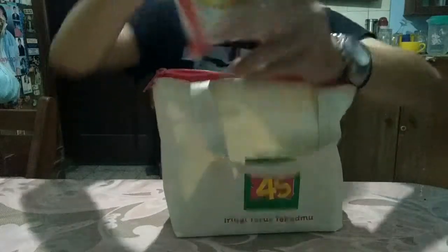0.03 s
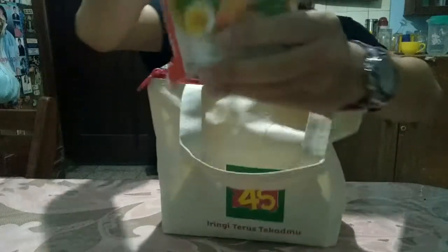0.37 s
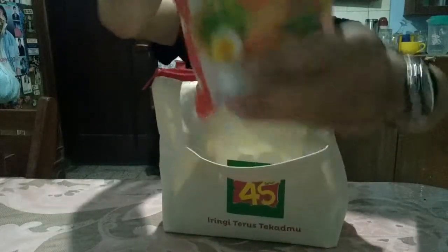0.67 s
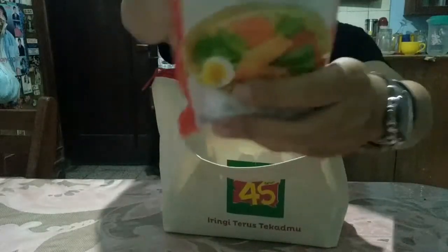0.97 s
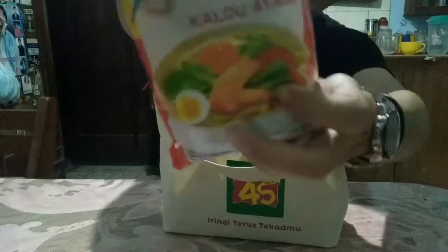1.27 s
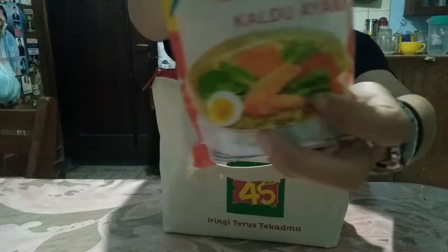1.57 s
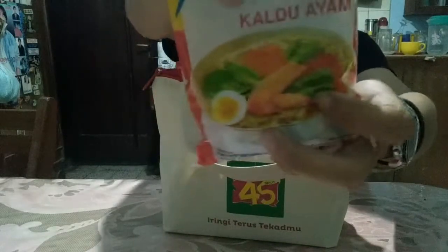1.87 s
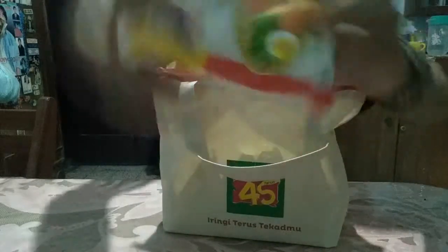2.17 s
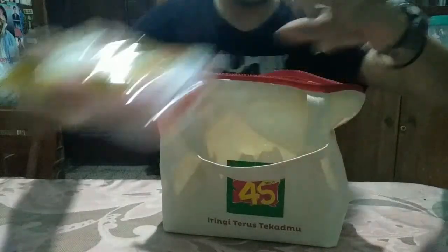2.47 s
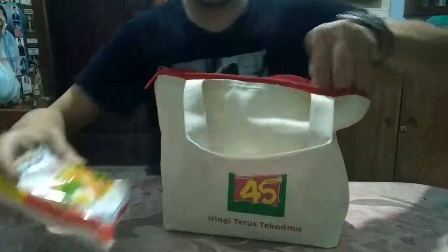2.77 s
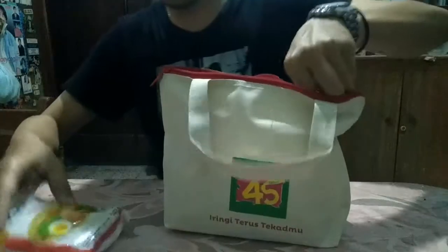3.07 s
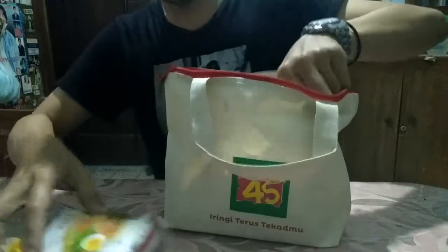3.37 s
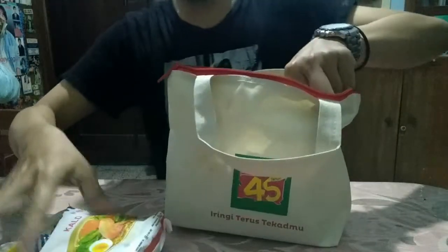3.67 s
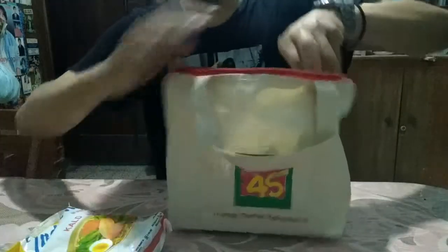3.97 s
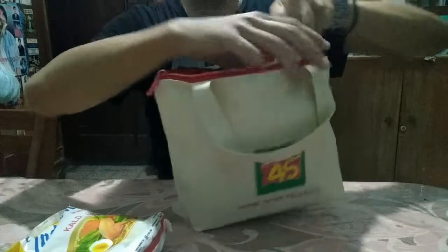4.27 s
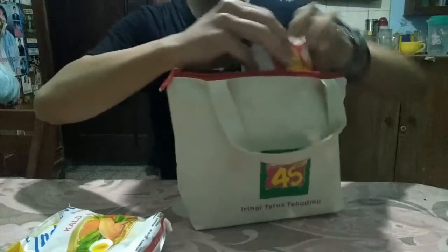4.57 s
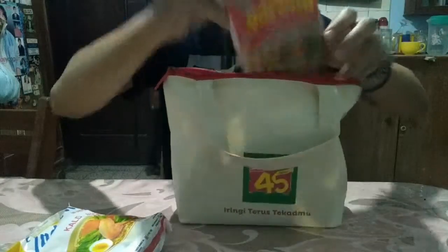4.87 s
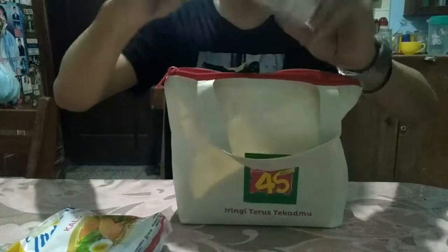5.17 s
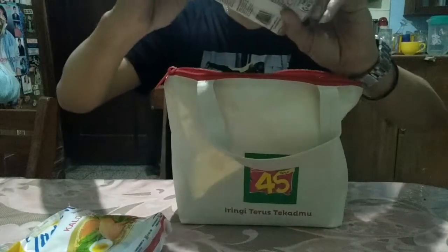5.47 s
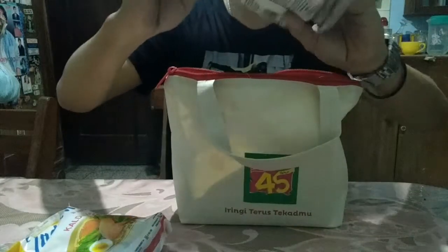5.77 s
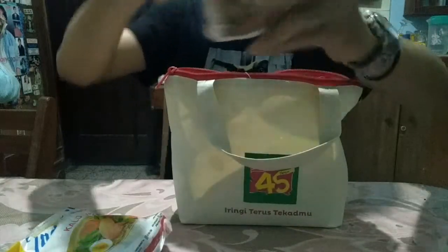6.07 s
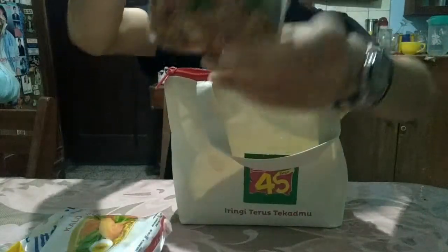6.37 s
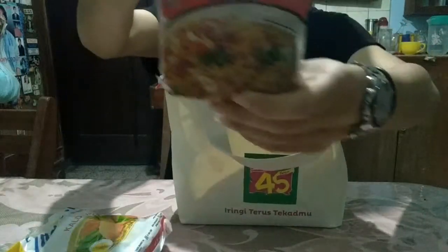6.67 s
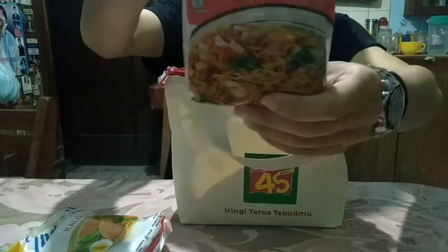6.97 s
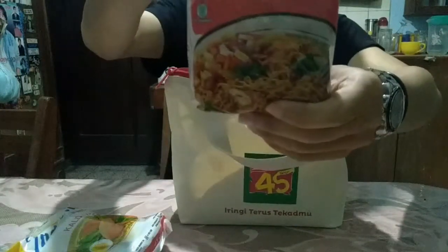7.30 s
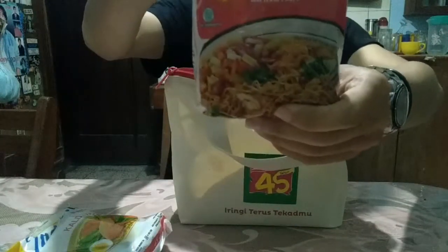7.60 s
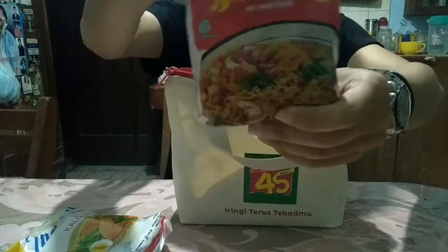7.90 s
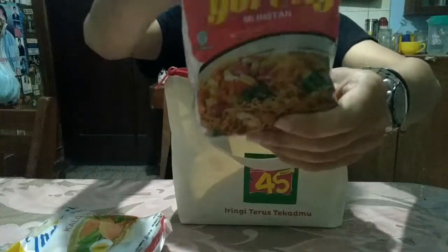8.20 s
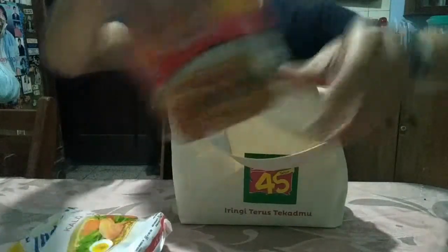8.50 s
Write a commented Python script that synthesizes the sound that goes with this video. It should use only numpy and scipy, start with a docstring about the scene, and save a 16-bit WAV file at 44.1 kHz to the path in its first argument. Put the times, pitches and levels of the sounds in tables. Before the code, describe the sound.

Plastic noodle packets crinkle and snap up close as they are pulled from a cloth bag, and one thumps onto a table.

```python
"""Plastic noodle packets crackle in the hands, close to a stereo microphone in a small room.
Each squeeze flips a swarm of tiny creases in the film, with sharp snaps standing out. The packets are
lifted out of a cloth bag and turned; the cloth rubs and the fingers knock softly. One packet is laid
on a table, which thumps under it and then under the hand. Behind it all a mains appliance hums faintly."""
import sys
import numpy as np
from scipy import signal
from scipy.fft import rfft, irfft, next_fast_len
from scipy.io import wavfile
from scipy.ndimage import uniform_filter1d

SR = 44100
rng = np.random.default_rng(int(sys.argv[2]) if len(sys.argv) > 2 else 0)


def store_wav(level_fs):
    """Save 16-bit WAV to argv[1]."""
    pcm = np.round(np.clip(np.atleast_2d(level_fs), -1, 1) * 32767)
    wavfile.write(sys.argv[1], SR, pcm.T.astype(np.int16))


N = 376613
TIME = np.arange(N) / SR
SECOND_PACKET_S = 4.0  # from here on the hands hold the second packet


def amp(db):
    """Decibels to gain."""
    return 10 ** (np.asarray(db) / 20)


def unit(x):
    """Scales to an rms of one."""
    return x / np.sqrt(np.mean(x ** 2) + 1e-20)


def unit_burst(x):
    """Scales each channel to the energy of 2 ms at an rms of one."""
    return x / np.sqrt(np.sum(x ** 2, 1, keepdims=True) / (.002 * SR))


def read(points, hz):
    """Reads a table on a log-frequency axis."""
    f, value = np.transpose(points)
    return np.interp(np.log(hz + 1), np.log(f), value)


def add(mix, s, sound):
    """Mixes a stereo sound in at time s."""
    part = mix[:, max(round(s * SR), 0):][:, :sound.shape[1]]
    part += sound[:, :part.shape[1]]


def panned(balance_db):
    """Left and right gains of constant power."""
    gains = amp(np.array([np.atleast_1d(balance_db), -np.atleast_1d(balance_db)]) / 2)
    return gains / np.sqrt(np.mean(gains ** 2, 0))


def flicker(samples):
    """A random curve of rms one, smoothed over so many samples."""
    return unit(uniform_filter1d(rng.standard_normal(N), size=samples))


def drift(knots_s):
    """A slow glide between random values at the given times."""
    return np.interp(TIME, knots_s, rng.standard_normal(len(knots_s)))


def flex(spread_oct=.12, step_s=.06):
    """Pitch factor of a sheet whose tension wanders as the fingers move."""
    return 2 ** (spread_oct * drift(np.arange(0, TIME[-1] + step_s, step_s)))


def stroke(start, length, rise_s, sag_db_per_s, release_db_per_s):
    """Envelope of one movement of the hand: rise, sloping hold, release."""
    t = np.clip(TIME - start, 0, 2)
    fall_db = sag_db_per_s * t + release_db_per_s * np.maximum(t - length, 0)
    return np.minimum(t / rise_s, 1) ** 2 * amp(-fall_db)


def resonate(x, hz, width_hz):
    """A resonance of gain one that follows the curve hz."""
    turn = np.exp(2j * np.pi * np.cumsum(hz) / SR)
    pole = np.exp(-np.pi * width_hz / SR)
    return 2 * (turn * signal.lfilter([1 - pole], [1, -pole], x * turn.conj() + 1e-18)).real


# likeness of diffuse sound at the two microphone ports: (frequency [Hz], correlation [0-1])
PORT_CORRELATION = [(60, 0.88), (250, 0.97), (500, 0.69), (1000, 0.64), (2000, 0.046), (16000, 0.093)]


def noise(spectrum, size, ripple_db=0, direct=0):
    """Coloured stereo noise with optional random bumps; direct sound is more alike at the two ports."""
    hz = np.fft.rfftfreq(size, 1 / SR)
    z = rfft(rng.standard_normal((2, size)))
    same = np.clip(np.maximum(read(PORT_CORRELATION, hz), direct), 0, 1)
    lag_s = rng.normal(.00004, .0001) if direct else 0
    z[1] = same * z[0] * np.exp(2j * np.pi * hz * lag_s) + np.sqrt(1 - same ** 2) * z[1]
    bumps = np.interp(hz, np.linspace(0, SR / 2, 28), rng.standard_normal(28))
    return unit(irfft(z * amp(read(spectrum, hz) + ripple_db * bumps), size))


# room tone, all around the microphone: (frequency [Hz], level [dB])
AIR_SPECTRUM = [(15, -69), (25, -43.5), (102, -11.5), (123, -22.5), (141, -12), (236, -17), (270, -26),
                (335, -12), (384, -28), (489, -20.5), (1160, -32), (14800, -39), (16000, -41.5)]
# tones of the appliance in the background: (frequency [Hz], level [dB])
HUM_TONES = [(48.6, -69), (97.5, -72.5), (150.5, -74)]


def room_tone(air_db=-66, whine_hz=14590, whine_db=-77.5, waver_rad=0.28):
    """Still air, the wavering hum of the appliance and a thin electrical whine."""
    knots = np.linspace(0, TIME[-1], 30)
    hum = sum(amp(db) * np.sqrt(2) * np.sin(2 * np.pi * hz * TIME + waver_rad * drift(knots))
              for hz, db in HUM_TONES)
    band = [(whine_hz - 500, -60), (whine_hz - 80, 0), (whine_hz + 80, 0), (whine_hz + 500, -60)]
    whine = amp(whine_db) * noise(band, size=N)
    return amp(air_db) * noise(AIR_SPECTRUM, size=N) + hum + whine


# decay of the small room: (frequency [Hz], t60 [s])
ROOM_DECAY = [(150, 0.15), (600, 0.07), (1500, 0.15), (4000, 0.11), (9000, 0.16), (15000, 0.16)]


def reflections(x, patterns=4, crossfade_hz=4.5, build_s=.006):
    """Dense room echoes, steadily crossfaded between several patterns so their colour keeps changing."""
    out = np.zeros((2, N))
    for k in range(patterns):
        hz, t, bands = signal.stft(noise([(100, 0), (16000, 0)], size=16384), SR, nperseg=256)
        decay = amp(-60 * t / read(ROOM_DECAY, hz)[:, None])
        tail = signal.istft(bands * decay, SR, nperseg=256)[1]
        tail *= 1 - np.exp(-(np.arange(tail.shape[1]) / SR / build_s) ** 2)
        share = np.sqrt(2 / patterns) * np.cos(np.pi * ((k // 2 + 1) * crossfade_hz * TIME + k / 2))
        out += signal.oaconvolve(x * share, tail / np.linalg.norm(tail[0]), axes=1)[:, :N]
    return out


# cloth and hands sliding over the packets, just left of centre: (start [s], length [s], level [dB])
CLOTH_RUBS = [(0.2, 0.31, -56), (0.48, 0.25, -73), (2.243, 0.2, -50.5), (2.634, 0.67, -63),
              (3.033, 0.32, -51.5), (3.47, 0.5, -56), (3.939, 0.34, -53), (4.36, 0.34, -49),
              (4.743, 0.3, -54.5), (5.15, 0.075, -51.5), (5.307, 0.51, -80), (6.195, 0.14, -71),
              (7.19, 0.38, -82), (7.98, 0.94, -74)]
# broad resonances of the rubbed bag: (frequency [Hz], level [dB])
BAG_RESONANCES = [(285, -10), (490, -5.5), (680, -4), (950, -12), (2500, 0), (5200, -0.5)]


def cloth(level_db=-6, uneven_db=6, weave_db=1, relative_width=0.28):
    """Fabric scuffs catch one resonance of the sagging bag after another; the weave makes it rough."""
    sliding = sum(amp(db) * stroke(start, length, rise_s=0.05, sag_db_per_s=-0.5, release_db_per_s=119.5)
                  for start, length, db in CLOTH_RUBS)
    weave = flicker(130)
    out = np.zeros((2, N))
    for hz, db in BAG_RESONANCES:
        grip = np.minimum(flicker(600), 1.5)
        scuff = noise([(hz / 4, -32), (hz / 2, -9), (hz, 0), (hz * 2, -7), (hz * 10, -35)], size=N)
        out += unit(resonate(scuff, hz * flex(), relative_width * hz)) * amp(db + uneven_db * grip)
    return panned(1.4) * out * sliding * amp(level_db + weave_db * weave)


# the packet lands on the table, then the hand, which bounces once: (time [s], level [dB])
TABLE_BLOWS = [(3.0643, -20.5), (3.294, -28.5), (3.336, -41)]
# modes of the tabletop: (frequency [Hz], level [dB], t60 [s])
TABLE_MODES = [(55, -3.5, 0.14), (87, 10, 0.089), (133, -1, 0.12), (220, 0.5, 0.061), (260, -20, 0.055),
               (345, -12, 0.064), (675, 6, 0.021)]


def table_thumps(rise_s=0.016):
    """The tabletop booms briefly under a cushioned blow; its lowest mode takes longest to swell."""
    out, t = np.zeros((2, N)), np.arange(SR // 2) / SR
    ring = np.zeros_like(t)
    for hz, db, t60 in TABLE_MODES:
        swell = 1 - np.exp(-t / rise_s * np.sqrt(hz / 200))
        ring += amp(db - 60 * t / t60) * np.sin(2 * np.pi * hz * t) * swell
    for s, level_db in TABLE_BLOWS:
        add(out, s, amp(level_db) * panned(0.65) * ring)
    return out


# fingers and packets knocking, just left of centre: (time [s], level [dB], pitch [Hz], rise [s])
FINGER_KNOCKS = [(0.056, -39, 360, 0.0045), (0.115, -44, 366, 0.0027), (0.18, -42, 610, 0.0041),
                 (0.202, -37.5, 430, 0.0017), (0.684, -33.5, 340, 0.0019), (0.727, -27, 353, 0.0019),
                 (0.932, -42.5, 710, 0.002), (1.1, -36, 453, 0.0019), (1.27, -43.5, 510, 0.0039),
                 (2.162, -32.5, 853, 0.0016), (2.406, -42, 490, 0.005), (2.462, -40.5, 510, 0.0045),
                 (2.588, -49, 306, 0.0035), (2.675, -44.5, 447, 0.0021), (2.769, -49, 317, 0.0056),
                 (3.062, -28, 302, 0.00085), (3.178, -43, 640, .002), (3.212, -44, 716, 0.0017),
                 (3.279, -50, 570, 0.0028), (3.296, -39.5, 284, 0.0052), (3.298, -35.5, 650, 0.003),
                 (3.348, -45, 560, 0.0019), (3.634, -45.5, 570, 0.0044), (3.702, -34, 660, 0.0023),
                 (3.78, -46.5, 338, 0.0046), (3.9, -36.5, 430, 0.0016), (4.081, -45, 500, 0.0046),
                 (4.284, -47, 540, 0.0035), (4.366, -45.5, 750, 0.0044), (4.413, -33, 610, 0.0016),
                 (4.571, -30.5, 820, 0.00086), (4.57, -34, 400, 0.0013), (4.657, -38.5, 284, 0.0059),
                 (4.687, -38.5, 302, 0.0047), (4.776, -43.5, 536, 0.0044), (4.84, -37, 578, 0.0032),
                 (4.956, -48, 620, 0.008), (5.007, -31.5, 543, 0.0011), (5.227, -38, 492, 0.0022),
                 (7.31, -44, 850, 0.001), (8.088, -49, 328, 0.0031), (8.124, -59, 298, .005),
                 (8.15, -49, 290, 0.0032), (8.172, -43.5, 298, 0.0068), (8.333, -44.5, 510, 0.0058),
                 (8.519, -40, 434, .002)]


def knocks(gain_db=1, settle_db=-12, settle_s=0.022):
    """Hollow contacts on the filled packets: a few cycles swell and die, then the contents settle."""
    out = np.zeros((2, N))
    for s, level_db, hz, rise_s in FINGER_KNOCKS:
        bands_hz = hz * 2. ** np.array([-2, -.5, 0, .5, 1, 3])
        contents = noise(list(zip(bands_hz, [-34, -7, 0, -7, -17, -55])), size=4096)
        t = np.arange(contents.shape[1]) / SR
        tap = (t / rise_s * np.exp(1 - t / rise_s)) ** 2 * np.sin(2 * np.pi * (hz * t + rng.random()))
        settling = amp(settle_db) * contents * (1 - np.exp(-t / rise_s)) * np.exp(-t / settle_s)
        add(out, s, amp(level_db + gain_db) * (tap + settling))
    return out * panned(1.4)


# a packet sweeps through the fingers, close by: (start [s], length [s], level [dB], pitch [Hz])
FILM_SWEEPS = [(2.297, 0.26, -43.5, 3300), (3.245, 0.039, -45, 4300), (5.292, 0.16, -40, 3900),
               (8.286, 0.09, -37.5, 3860)]


def swishes(slips_per_s=3000, width_hz=1900):
    """Film slides under the fingers: dense tiny slips ring the flexing sheet, swelling and fading."""
    out = np.zeros((2, N))
    for start, length, level_db, hz in FILM_SWEEPS:
        size = int(length * SR)
        slips = rng.standard_normal((2, size)) * (rng.random(size) < slips_per_s / SR)
        pitch = hz * flex()[:size]
        sheet = resonate(resonate(slips, pitch, width_hz), pitch, width_hz)
        add(out, start, amp(level_db) * unit(sheet) * np.sin(np.pi * np.arange(size) / size))
    return out


# modes of the air-filled packet: (frequency [Hz], level [dB], t60 [s])
PACKET_MODES = [(1335, 10.5, 0.02), (2510, -29, 0.33), (3900, -8.5, 0.076)]


def pop(at_s=0.6135, level_db=-28, rise_s=0.0011):
    """A whole face of the sealed packet flips once under the thumb and rings hollow."""
    out, t = np.zeros((2, N)), np.arange(SR // 4) / SR
    ring = sum(amp(db - 60 * t / t60) * np.sin(2 * np.pi * (hz * t + rng.random((2, 1)) / 4))
               for hz, db, t60 in PACKET_MODES)
    add(out, at_s, amp(level_db) * ring * (1 - np.exp(-t / rise_s)))
    return out


def buckle(spectrum, decay_s, flutter_db, flutter_s, ripple_db):
    """One crease flips near the microphone: a short burst, then a weaker flutter of the sheet."""
    burst = noise(spectrum, size=1024, ripple_db=ripple_db, direct=0.56)
    t = np.arange(burst.shape[1]) / SR
    attack = 1 - np.exp(-t / .0005)
    decay = np.exp(-(t / decay_s) ** 2) + amp(flutter_db) * np.exp(-t / flutter_s)
    return unit_burst(burst * attack * decay)


def crack(spectrum):
    """The bright part of a crease: the fold flips, and a weaker echo off the nearby packet or table follows
    within two milliseconds; some folds are faster than others."""
    flip = buckle(spectrum, rng.uniform(.00045, .0011), flutter_db=-16, flutter_s=.002, ripple_db=7)
    lag, echo_gain = int(rng.uniform(.0006, .0018) * SR), rng.uniform(.15, .65)
    bounce = echo_gain * np.pad(flip, ((0, 0), (lag, 0)))[:, :-lag]
    return (flip + bounce) / np.hypot(1, echo_gain)


# spectrum of the panel of film around a fold: (frequency [Hz], level [dB])
PANEL_SPECTRUM = [(60, -48.5), (300, 0), (750, -13.5), (1050, 2), (1350, 7), (1950, 4), (2700, 6),
                  (3800, 2), (5500, 3), (8000, -10), (11000, -37.5)]
PACKET_TUNING = (0.97, 1.146)  # pitch factors: the first packet is slacker and sounds lower


def panel(packet, panel_db=-14, spread_oct=0.29):
    """The lower part of a crease, from the film around it; a larger, louder panel sounds hollower."""
    tilt_db_per_oct = np.clip(0.33 * (panel_db + 10), -1, 2)
    tuning = PACKET_TUNING[packet] * 2 ** (spread_oct * rng.uniform(-1, 1))
    colour = [(hz * tuning, db - tilt_db_per_oct * np.log2(max(hz, 1200))) for hz, db in PANEL_SPECTRUM]
    return buckle(colour, decay_s=.002, flutter_db=-13, flutter_s=.003, ripple_db=7.5)


# each grip, pull or turn that strains the film in front of the microphone:
# (start [s], length [s], level [dB], panel relative to fold [dB], left-right [dB])
HAND_SQUEEZES = [ (0.0, 0.019, -22.5, -21.5, -2), (0.046, 0.094, -25, -14, 1),
                 (0.138, 0.067, -30.5, -16.5, 0.5), (0.256, 0.084, -26, -22, 6),
                 (0.294, 0.13, -22.5, -16.5, 1.5), (0.487, 0.24, -26.5, -17, 1),
                 (0.737, 0.053, -27.5, -18.5, 0), (1.066, 0.099, -25.5, -12.5, 0.5),
                 (1.161, 0.062, -18.5, -15, 1), (1.258, 0.066, -28.5, -12, 2.5),
                 (2.078, 0.099, -27, -10.5, 0.5), (2.205, 0.14, -29.5, -11, 2.5),
                 (2.309, 0.26, -20, -15, 0.5), (2.514, 0.097, -27.5, -15, -0.5),
                 (2.63, 0.18, -32, -17.5, -1), (2.847, 0.27, -46.5, -18.5, -2.5),
                 (2.965, 0.04, -35.5, -22, 2), (3.033, 0.19, -23, -16.5, -0.5),
                 (3.237, 0.068, -22.5, -13, 0), (3.347, 0.19, -34.5, -19.5, -1),
                 (3.498, 0.12, -30, -19.5, 1), (3.66, 0.035, -45.5, -5.5, 2), (3.805, 0.07, -27, -16, 0),
                 (3.99, 0.3, -45, -8, 3.5), (4.216, 0.055, -33, -15, 3.5), (4.352, 0.11, -31, -18, 2),
                 (4.514, 0.25, -27.5, -18, 2.5), (4.623, 0.15, -22, -20, 2), (4.803, 0.17, -27.5, -21, 1.5),
                 (4.982, 0.052, -24.5, -17.5, 2), (5.085, 0.35, -40.5, -13, 1.5),
                 (5.216, 0.088, -30.5, -16.5, 3), (5.268, 0.16, -23.5, -21.5, 2),
                 (5.734, 0.034, -59.5, -10, 1), (5.87, 0.07, -57, -20, 2), (5.964, 0.2, -30, -21, 9),
                 (6.05, 0.27, -26.5, -15, 1.5), (6.402, 0.021, -25.5, -12.5, 1),
                 (6.474, 0.14, -37.5, -22, 3), (6.601, 0.2, -31, -12.5, 2), (6.675, 0.21, -32.5, -15.5, 1),
                 (6.918, 0.18, -49, -12.5, 1), (7.206, 0.036, -50, -22, -2), (7.258, 0.023, -36, -20, 3),
                 (7.475, 0.033, -46.5, -15, 2), (7.74, 0.038, -43, -27, 2), (7.988, 0.16, -26.5, -13, 0.5),
                 (8.152, 0.17, -28.5, -14, 2), (8.276, 0.043, -19.5, -14.5, 1), (8.373, 0.024, -28, -12, 1),
                 (8.456, 0.093, -32, -9, 1)]
# pace of the small creases, highest as a packet scrapes out of the bag: (time [s], rate [1/s])
CREASE_PACE = [(0, 1160), (2.4, 1270), (3.3, 1560), (4.1, 2000), (5, 2030), (5.4, 2600), (6, 765),
               (8.5, 930)]
# spectrum of the smallest folds, heard close: (frequency [Hz], level [dB])
SMALL_FOLD_SPECTRUM = [(100, -75), (2400, -31.5), (4200, -19), (6500, -10.5), (8500, -8.5), (10200, -3.5),
                       (11700, 5), (13200, 2.5), (14400, -3), (15300, -1), (15800, -18)]


def crackle(fold_db=-5, stray_per_s=32, stray_db=4.5, variants=60):
    """Swarms of small creases, few large and many tiny, as strong as the hands work the film."""
    fold_gain, panel_gain = np.zeros((2, 2, N))
    for start, length, level_db, panel_db, balance_db in HAND_SQUEEZES:
        # a squeeze builds up, eases while it is held, then the film relaxes
        squeeze = stroke(start, length, rise_s=0.027, sag_db_per_s=18, release_db_per_s=188)
        strain = amp(level_db) * panned(balance_db) * squeeze
        fold_gain = np.maximum(fold_gain, amp(fold_db) * strain)
        panel_gain = np.maximum(panel_gain, amp(panel_db) * strain)
    flips = rng.random(N) < np.interp(TIME, *np.transpose(CREASE_PACE)) / SR
    sizes = amp(4.5 * np.minimum(rng.exponential(1, N), 3)) * flips
    # the hands feed in strain steadily, so a large flip leaves less for its neighbours
    sizes /= np.sqrt(np.abs(uniform_filter1d(sizes ** 2, size=1300)) * .002 * SR + 1e-3)
    # the fingers grip and slip, so the creases come in clumps
    sizes *= amp(2.8 * flicker(600) - 1.8)
    # now and then a middling crease stands out of the swarm
    sizes += amp(stray_db) * rng.uniform(0.23, 1, N) * (rng.random(N) < stray_per_s / SR)
    pick, out = rng.integers(0, variants, (N, 2)), np.zeros((2, N))
    folds = [crack(SMALL_FOLD_SPECTRUM) for _ in range(variants)]
    panels = [[panel(packet) for _ in range(variants)] for packet in range(2)]
    for i in np.flatnonzero(sizes * fold_gain[0] > 1e-6):
        packet = int(TIME[i] > SECOND_PACKET_S)
        fold = fold_gain[:, i, None] * folds[pick[i, 0]]
        body = panel_gain[:, i, None] * panels[packet][pick[i, 1]]
        add(out, TIME[i], sizes[i] * (fold + body))
    return out


# resonances of the taut film: (centre frequency [Hz], width [Hz], level [dB])
FILM_RESONANCES = [(2680, 120, 1.5), (3436, 130, 4.5), (4325, 79, 6.5), (5440, 170, 7), (7470, 110, -5.5)]


def taut_film(creases, spread_oct=.14):
    """Stretched film rings with its creases, at pitches that jump with each grip and bend within it."""
    grip = np.searchsorted(sorted(row[0] for row in HAND_SQUEEZES), TIME)
    tuning = 2 ** (spread_oct * rng.standard_normal((len(HAND_SQUEEZES) + 1, len(FILM_RESONANCES))))
    return creases + sum(amp(db) * resonate(creases, hz * tuning[grip, k] * flex(), width_hz)
                         for k, (hz, width_hz, db) in enumerate(FILM_RESONANCES))


def clack(hz, decay_s=0.009, linger_db=-22, linger_s=0.024):
    """The flipped panel rings briefly at its own pitch and two nearby ones, then lingers faintly."""
    t = np.arange(1024) / SR
    modes_hz = np.array([[1], [.87], [1.13]])[:, None] * hz
    turns = modes_hz * t + rng.random((3, 1, 1)) + rng.random((3, 2, 1)) / 4
    main, lower, upper = np.sin(2 * np.pi * turns)
    ring = (main + .5 * lower + .5 * upper) * np.exp(-t / decay_s)
    linger = amp(linger_db) * main * np.exp(-t / linger_s)
    return unit_burst((ring + linger) * (1 - np.exp(-t / .0003)) * (1 - t / t[-1]))


# spectrum of a large fold, heard close: (frequency [Hz], level [dB])
LARGE_FOLD_SPECTRUM = [(100, -49), (2400, -35), (4200, -32), (6500, -20.5), (8500, -14), (10200, -14),
                       (11700, -1), (13200, -6), (14400, -1), (15300, -15), (15800, -14)]
# the creases that stand out of the crackle, right in front of the microphone, and two faint finger ticks near
# 1.55 s played the same way: (time [s], level [dB], relative panel level [dB], left-right [dB], panel pitch
# [Hz])
LARGE_CREASES = [(0.0099, -18, -21, 1, 6800), (0.0168, -46, -19, -0.5, 5600),
                 (0.054, -15.5, -14.5, 0, 6940), (0.0642, -20.5, -13.5, -17.5, 3900),
                 (0.088, -17, -24, 6, 5070), (0.1067, -22, -18, -7, 4500), (0.2488, -18.5, -14, 4, 6700),
                 (0.26, -20.5, -18, -2, 3380), (0.2763, -16, -37, 1.5, 6260),
                 (0.2922, -16.5, -21, -10, 7600), (0.338, -17, -18, -6, 2800),
                 (0.349, -14.5, -12, -1, 6900), (0.393, -27, -17.5, -6, 3510),
                 (0.4263, -16.5, -15.5, -3, 2860), (0.449, -22.5, -18.5, -4, 3070),
                 (0.521, -24, -15.5, -4, 5580), (0.603, -11, -18.5, -6, 4300),
                 (0.615, -20.5, -8.5, 0, 1330), (0.6877, -19.5, -39, 0, 5500), (0.704, -21, -21, 0, 2500),
                 (0.7638, -23.5, -31, 0, 7470), (0.787, -26, -11, -3, 5870), (0.803, -29, -15, -6, 6970),
                 (0.8266, -23, -27, 1, 7160), (0.879, -29.5, -41, -7, 7300), (0.972, -42, -18, -8, 3510),
                 (1.083, -20, -11.5, -3.5, 6540), (1.0887, -18, -19, -7, 6900), (1.097, -14, -15, -5, 4850),
                 (1.1046, -11.5, -11, 4, 2690), (1.11, -18.5, -16, -7, 3700), (1.119, -18.5, -28, -3, 5230),
                 (1.182, -22, -27, -10, 4320), (1.193, -19, -42, -6, 6400), (1.2076, -23.5, -6.5, 8, 2880),
                 (1.2724, -21, -11, 0, 1270), (1.282, -14.5, -12.5, -3, 1420),
                 (1.305, -15.5, -11.5, 3, 5400), (1.337, -27.5, -7.5, -1, 3550),
                 (1.386, -28.5, -9, -5, 6830), (1.4289, -17, -33, -1, 7100), (1.542, -68, 14, 2, 1560),
                 (1.554, -58, 5, -5, 1690), (2.1, -28, -30, -13, 7450), (2.1114, -20, -4.5, -6, 2110),
                 (2.1348, -28, -11, 0, 6840), (2.1642, -22, -10, -1.5, 2380), (2.2261, -26.5, -5, -3, 6770),
                 (2.2513, -16.5, -26, -5, 6400), (2.281, -10, -18, 3, 6370), (2.294, -13, -16.5, -5, 7250),
                 (2.302, -13, -22, -1, 4700), (2.335, -14.5, -15.5, 0.5, 3400),
                 (2.3457, -25, -23, -9, 4000), (2.375, -29, -26, -6, 2600), (2.3896, -17, -22, -8, 2800),
                 (2.408, -17, -7, 0, 5700), (2.447, -17, -24, -6, 3250), (2.609, -25.5, -24, -6, 6360),
                 (2.6864, -20.5, -19, -7, 2740), (2.72, -25, -21, 0, 5600), (2.769, -19.5, -27, 4, 5550),
                 (2.804, -28, -31, -3, 6600), (2.9467, -46.5, -1, -8, 5150), (2.965, -45, -8, -6, 5300),
                 (2.988, -19, -20, -5, 5800), (3.0677, -13, -13, -10, 4080), (3.128, -26.5, -20, -7, 5250),
                 (3.156, -15, -15, -1, 5860), (3.2097, -13.5, -19.5, -6, 4620), (3.214, -18, -9, -10, 6150),
                 (3.232, -23, -9, 7, 4570), (3.251, -15.5, -16, -10, 4570), (3.268, -16, -33, -7, 3480),
                 (3.279, -15, -7, -4, 5300), (3.2878, -15.5, -15.5, -12, 6550), (3.517, -20, -22, -6, 4600),
                 (3.5274, -24.5, -13.5, -10, 5600), (3.835, -21, -9, -15, 2690),
                 (3.8573, -13.5, -20, -2, 6300), (3.9804, -28.5, -19, 7, 2530), (4.3263, -31, -13, 9, 2710),
                 (4.342, -29, -23, 2, 5880), (4.3698, -29.5, -25, 12, 5340), (4.402, -20.5, -16.5, 2, 2190),
                 (4.414, -22, -22, -1, 6700), (4.4568, -28, -21, 4, 6930), (4.573, -34, -1, -2, 1210),
                 (4.6116, -20, -13.5, 5, 2750), (4.6466, -16.5, -22, 2, 4550),
                 (4.6597, -12.5, -23.5, 6, 5880), (4.6734, -25, -20, 6, 6110), (4.84, -26, -20, 0, 4500),
                 (4.8804, -23, -32, -6, 7130), (4.9402, -32, -23, 3, 3290), (5, -34, -28, 9, 7580),
                 (5.0088, -25, -17, -0.5, 5220), (5.032, -25, -13, -9, 3860), (5.039, -24, -19, 4, 7500),
                 (5.097, -18.5, -19, 3, 5320), (5.2417, -33, -7.5, 7, 1880), (5.265, -15, -19, 2, 7560),
                 (5.3, -20, -28, -2, 6090), (5.345, -20, -20.5, 0, 3150), (5.363, -19.5, -19, -12, 4000),
                 (5.3696, -13, -28, -1, 4630), (5.42, -16.5, -22.5, 2, 6650), (5.4772, -17, -48, 3, 7500),
                 (5.529, -25.5, -40, 1, 6400), (5.5975, -38, -20, 2, 1780), (5.953, -38.5, -22, -7, 7650),
                 (5.976, -32, -10, 1, 2120), (5.998, -25.5, -16, -10, 5650), (6.0234, -30, -11, 2, 3400),
                 (6.0372, -19.5, -17, -1, 3530), (6.0685, -27, -8.5, -5, 6950), (6.081, -19, -26, 4, 7000),
                 (6.1113, -23.5, -10, -2, 4650), (6.141, -28, -24, 8, 6740), (6.215, -15, -13, -1, 5960),
                 (6.2263, -18.5, -34, 20, 5660), (6.24, -17.5, -12.5, 0, 1380),
                 (6.293, -22.5, -13, -6, 5450), (6.3175, -24, -14, 0, 5100), (6.34, -17.5, -19, -2, 5460),
                 (6.3765, -18, -14, -1.5, 6020), (6.3904, -21.5, -18, 6, 2680),
                 (6.412, -19, -7.5, -2, 1560), (6.4246, -19.5, -10.5, -1, 4850),
                 (6.501, -19.5, -25, 0, 7240), (6.5071, -22.5, -20.5, 1, 3020),
                 (6.584, -29, -15, 1.5, 5500), (6.601, -21.5, -17, 0, 6900), (6.609, -21, -33, -2, 7500),
                 (6.641, -20, -14.5, -7, 2780), (6.682, -23, -7, -5, 1290), (6.708, -13, -32, -2, 4140),
                 (6.7232, -14.5, -16.5, -2, 4820), (6.808, -23.5, -15.5, -6, 6500),
                 (6.843, -36, -2, -6, 4900), (6.8601, -19.5, -10.5, 0, 4980),
                 (6.8655, -23.5, -9.5, -14, 5140), (6.937, -32, -17, -5, 6820), (6.9483, -12, -17, 0, 6900),
                 (7.0885, -33.5, -20, -13, 6600), (7.204, -41, -17, -3, 1220), (7.221, -31.5, -22, 1, 7400),
                 (7.281, -40, -32, -2, 5840), (7.2893, -26, -38, -13, 7000), (7.3123, -32.5, -10, 1, 1314),
                 (7.489, -34, -10, 10, 1830), (7.493, -28, -15.5, -15, 4200),
                 (7.7419, -35.5, -8.5, -2, 6670), (7.77, -23, -33, -3, 7250), (7.995, -29, -8.5, -1, 3620),
                 (8.035, -30, -6, -4, 4200), (8.047, -17.5, -17, -2, 7350), (8.083, -10.5, -25, -2, 7400),
                 (8.0906, -23, -4.5, 0, 3910), (8.1834, -7, -19, 5, 7070), (8.189, -22, -3.5, -10, 7130),
                 (8.239, -20, -16, 0, 4430), (8.2594, -21, -20, 8, 6760), (8.2835, -13.5, -13, -3, 4350),
                 (8.3035, -20, -15, 1, 7150), (8.3329, -20, -7, 0, 4040), (8.3456, -11, -20, -1, 7100),
                 (8.411, -25.5, -10.5, 1, 4240), (8.465, -24, -9.5, -3, 1520), (8.4816, -22, -13, 4, 1560),
                 (8.5006, -22, -13, -1, 4300), (8.5213, -10, -17.5, 0, 5200)]


def snaps(crack_db=1.5, slip_db=-15, lead_s=0.0022, neighbour_db=-6, slips=4, radiates_hz=2960):
    """The large creases, each with its own pitch: a few tiny slips, the flip, then its neighbour."""
    out = np.zeros((2, N))
    for s, level_db, panel_db, balance_db, hz in LARGE_CREASES:
        gain, body = amp(level_db) * panned(balance_db), amp(panel_db)
        packet = int(s > SECOND_PACKET_S)
        radiation = min(hz / radiates_hz, 1)  # a low-pitched panel radiates weakly
        fold = amp(crack_db) * crack(LARGE_FOLD_SPECTRUM)
        flip = fold + body * (panel(packet, panel_db) + radiation * clack(hz))
        add(out, s - .0003, gain * flip)
        neighbour = crack(SMALL_FOLD_SPECTRUM) + body * panel(packet, panel_db)
        add(out, s + rng.uniform(.0005, .0025), gain * amp(neighbour_db) * neighbour)
        for early in rng.exponential(1, slips):
            add(out, s - lead_s * early, gain * amp(slip_db - early) * neighbour)
    # the large creases carry little below 750 Hz
    return signal.sosfilt(signal.butter(2, 750, "highpass", fs=SR, output="sos"), out)


def scene():
    """Packets, bag and table close to the microphone, with the small room behind them."""
    snapping = snaps() + pop()
    rustling = taut_film(crackle()) + swishes()
    knocking, thumping = knocks(), table_thumps()
    to_walls = amp(-11.5) * snapping + amp(-2.5) * rustling + amp(-7) * knocking + amp(-5.5) * thumping
    echo = reflections(to_walls)
    return snapping + rustling + knocking + thumping + cloth() + echo + room_tone()


# the two microphone ports ring at different pitches: (frequency [Hz], left-right [dB])
PORT_BALANCE = [(200, 0.5), (800, -4), (1800, 0), (3000, 0.5), (4500, -2), (7000, -1.5), (9500, -1),
                (11600, -9.5), (12600, 3), (13300, -14.5), (14100, 11.5), (15500, 20)]


def record(dry, low_cut_hz=38, cutoff_hz=15750):
    """The stereo microphone: colour of its two ports, a low cut, the full-scale and band limits."""
    size = next_fast_len(N + 4096)
    hz = np.fft.rfftfreq(size, 1 / SR)
    low_cut = signal.freqz(*signal.butter(3, low_cut_hz, "highpass", fs=SR), hz, fs=SR)[1]
    heard = irfft(rfft(dry, size) * panned(read(PORT_BALANCE, hz)) * low_cut, size)[:, :N]
    lowpass = signal.firwin(255, cutoff_hz, window=("kaiser", 8), fs=SR)
    return signal.oaconvolve(np.clip(heard, -1, 1), lowpass[None], "same")


dry = scene()
out = record(dry)
store_wav(out)
```